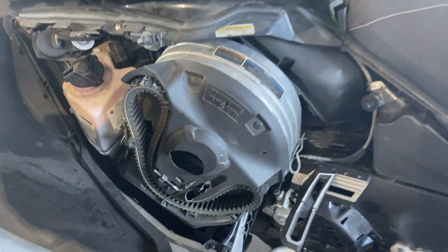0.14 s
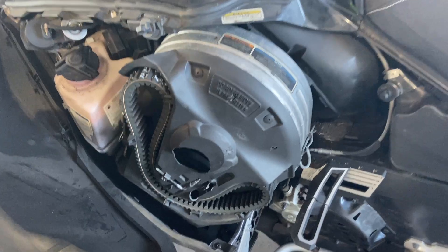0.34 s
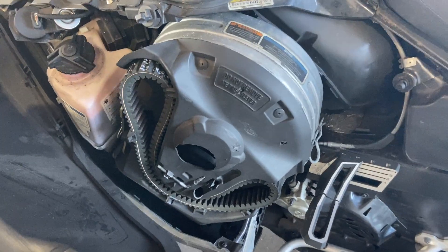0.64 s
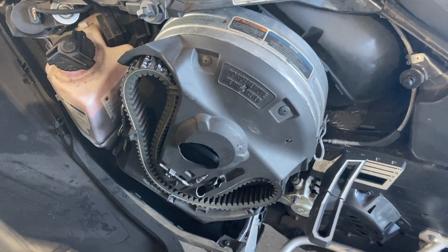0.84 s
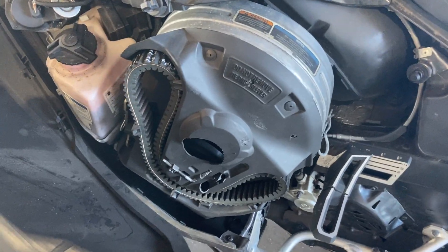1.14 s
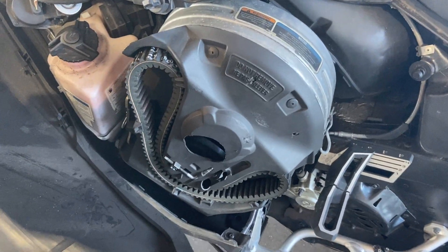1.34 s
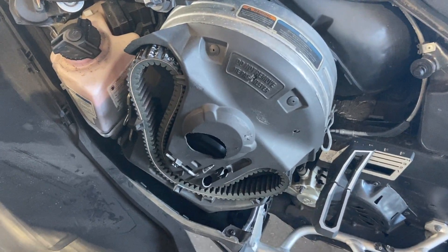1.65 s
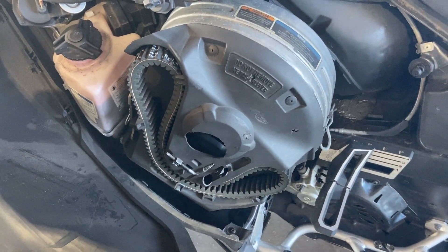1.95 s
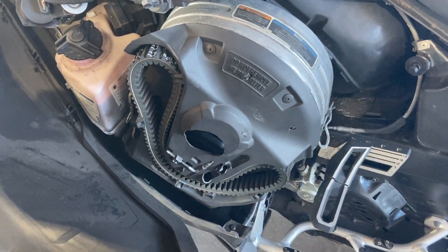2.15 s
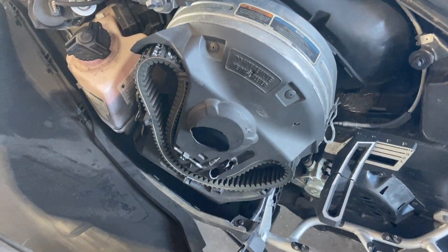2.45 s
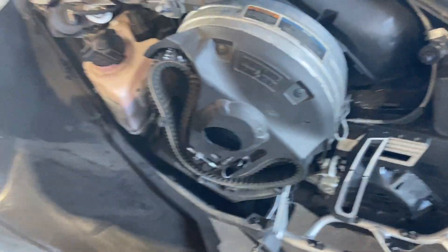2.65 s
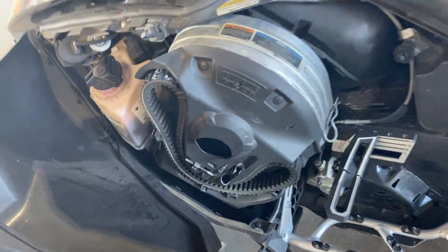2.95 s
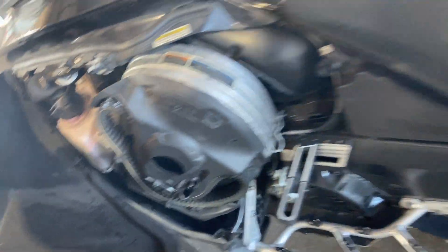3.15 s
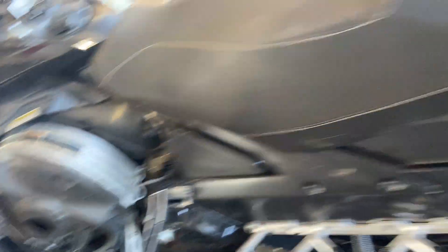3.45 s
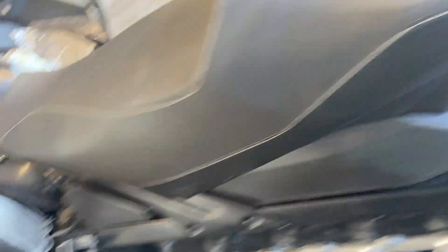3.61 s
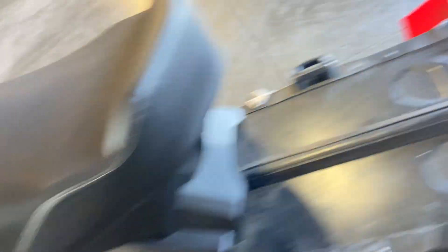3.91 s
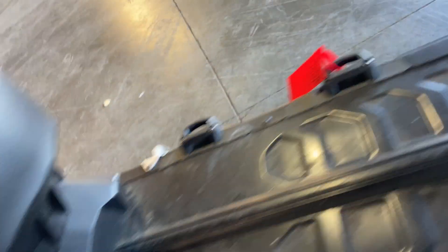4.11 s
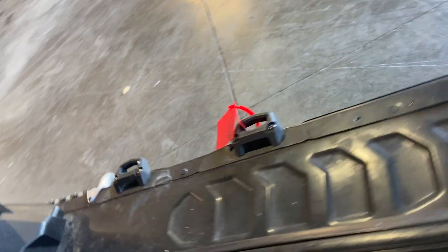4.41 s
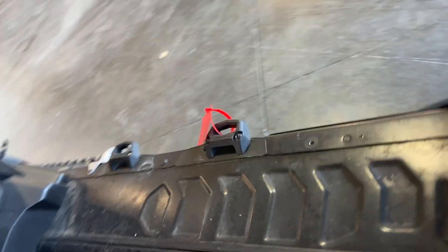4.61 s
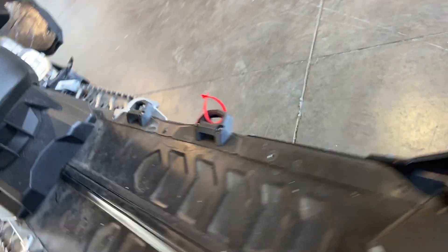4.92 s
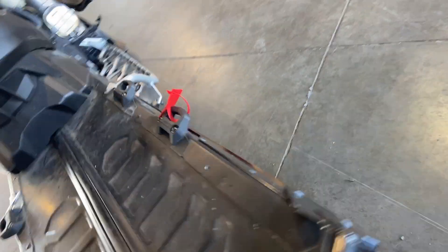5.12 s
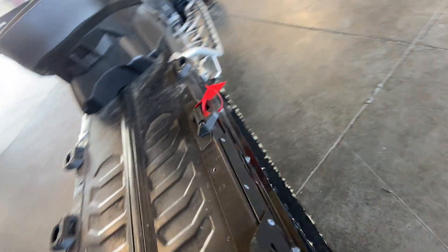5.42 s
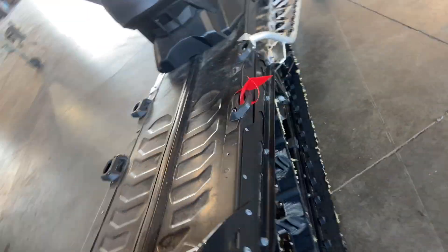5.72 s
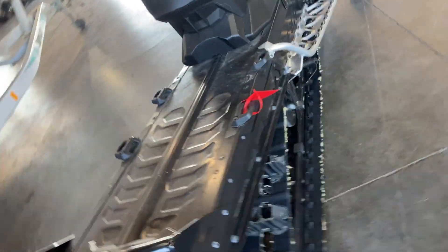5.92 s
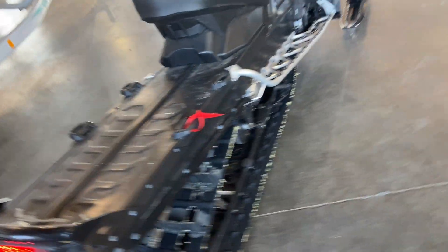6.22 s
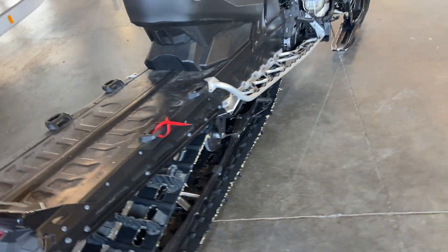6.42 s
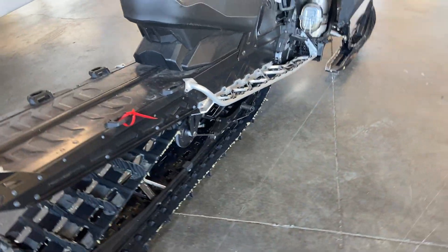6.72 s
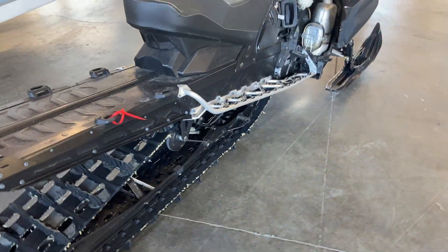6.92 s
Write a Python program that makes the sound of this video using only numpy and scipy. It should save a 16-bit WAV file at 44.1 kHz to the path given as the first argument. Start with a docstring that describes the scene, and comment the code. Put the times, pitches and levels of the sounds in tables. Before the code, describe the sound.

Close, raspy two-cylinder idle with low drone, metallic knocking and airy hiss; a few brighter knocks as the listener swings back, then a softer, boomier idle.

```python
"""A two-cylinder two-stroke snowmobile engine idles in a hard-floored shop, heard by a hand-held stereo microphone.
At first it is held close at the open engine bay: the pipe drones on crank orders, uneven burns rumble through ringing
muffler modes, shaped noise clatters twice a turn, struck metal modes ring with a hard knock and a soft tap each turn,
and filtered noise hisses at the intake. After three seconds it swings back past the seat, where some knocks ring
brighter, returns to just behind the seat, then moves on to the rear of the track and stays there."""
import sys
import numpy as np
from scipy import signal
from scipy.fft import rfft, irfft, next_fast_len
from scipy.io import wavfile
from scipy.ndimage import uniform_filter1d, map_coordinates

SR = 44100
rng = np.random.default_rng(int(sys.argv[2]) if len(sys.argv) > 2 else 0)


def to_wav(sig):
    """Store sig (one row per channel, or 1-D mono) as 16-bit WAV at the path in sys.argv[1].

    Samples outside -1..1 are clipped; the rate is SR.
    """
    pcm = np.clip(np.atleast_2d(sig), -1, 1) * 32767
    pcm = np.round(pcm).astype(np.int16)
    wavfile.write(sys.argv[1], SR, pcm.T)  # frames by channels


N = 311330
T = np.arange(N) / SR  # seconds

# The unsteady idle of the crank. Each row: time in seconds, speed in turns per second.
IDLE_SPEED = [(0.0, 19.63), (0.128, 19.38), (0.257, 19.66), (0.385, 19.22), (0.513, 19.3), (0.642, 19.67),
              (0.77, 19.65), (0.899, 19.29), (1.027, 19.47), (1.155, 19.57), (1.284, 19.45), (1.412, 19.28),
              (1.54, 19.21), (1.669, 19.14), (1.797, 19.49), (1.925, 19.95), (2.054, 20.04), (2.182, 18.86),
              (2.311, 20.1), (2.439, 19.27), (2.567, 19.7), (2.696, 18.99), (2.824, 20.31), (2.952, 20.65),
              (3.081, 19.33), (3.209, 19.64), (3.337, 20.58), (3.466, 20.64), (3.594, 19.35),
              (3.723, 19.61), (3.851, 19.2), (3.979, 20.03), (4.108, 19.17), (4.236, 19.39), (4.364, 19.77),
              (4.493, 19.35), (4.621, 19.91), (4.749, 19.84), (4.878, 19.94), (5.006, 18.27),
              (5.135, 20.29), (5.263, 18.84), (5.391, 20.41), (5.52, 19.72), (5.648, 20.11), (5.776, 19.92),
              (5.905, 19.37), (6.033, 20.26), (6.161, 19.97), (6.29, 21.06), (6.418, 20.42), (6.547, 19.26),
              (6.675, 19.63), (6.803, 20.18), (6.932, 19.23), (7.06, 19.47)]


def crank_turns():
    """The crank angle in turns is the running sum of its speed."""
    start_turn = .063
    speed = np.interp(T, *np.transpose(IDLE_SPEED))
    return start_turn + np.cumsum(speed) / SR


TURN = crank_turns()

# The drone steepens into crests. Each row: time in seconds, 2nd partial in dB, 3rd partial in dB,
# their phase lead in radians.
DRONE_CRESTS = [(0, -34, -41, 0.81), (1.4, -32, -34, 1), (2.1, -34, -29.5, 0.69), (2.6, -33, -34, 0.55),
                (3.3, -30, -34.5, 0.28), (3.8, -34.5, -36, -0.2), (4.2, -31, -33, -.8),
                (4.6, -29.5, -33.5, -0.82), (5.0, -29, -26.5, -1.1), (5.4, -27, -36, -1.2),
                (5.8, -34.5, -54, -1), (6.2, -30.5, -32, .2), (6.6, -29, -32, 0.29),
                (7.06, -31, -28, -0.094)]
# Other crank orders; a half order comes of every second turn burning harder.
# Each row: order in cycles per turn, rms level in dB at the bay, the seat and the rear.
CRANK_ORDERS = [(2, -30, -31.5, -33.5), (3, -43, -61, -35), (4, -28.5, -34, -34.5), (5.5, -53, -55, -45),
                (8, -37.5, -42, -34.5), (10, -40, -43, -46.5), (14, -37.5, -42, -43), (20, -39.5, -51, -50)]


def drone():
    """The regular bass of the exhaust beat: the pipe sings on the sixth order."""
    note = 2 * np.pi * 6 * TURN
    waver_db = placed((0.3, 0.34, 0.61), T) * wobble(25)
    x = amp(walk()["drone"] + waver_db) * np.cos(note)

    *crests, lead = curves(DRONE_CRESTS)
    # the top crest swells with each firing
    depth, chuff_turn = placed((.25, 0.86, 0.36), T), 0.068
    chuff = 1 + depth * np.cos(2 * np.pi * 2 * (TURN - chuff_turn))
    for partial, db, swell in zip((2, 3), crests, (1, chuff)):
        waver_db, waver_rad = .8 * wobble(8), .15 * wobble(8)
        x += swell * amp(db + waver_db) * np.cos(partial * note + lead + waver_rad)

    for order, *db in CRANK_ORDERS:
        waver_db, waver_rad = 1.2 * wobble(7), .25 * wobble(6)
        angle = 2 * np.pi * round(2 * order) / 2 * TURN
        x += amp(placed(db, T) + waver_db) * np.cos(angle - .7 + waver_rad)
    return np.sqrt(2) * x * amp([[.4], [-.4]])  # rms to peak; a touch louder on the left


# What each firing rings in the muffler.
# Each row: centre in Hz, width in Hz, relative level in dB at the bay, the seat and the rear.
MUFFLER_MODES = [(273.1, 16, -1.5, -18, -8), (338, 11, -16, -9, -13), (392, 6.2, -4.5, -15, -8.5),
                 (473, 18, -10, -31, -38)]
# Uneven burns through pipe and hood. Each row: frequency in Hz, relative level in dB at the bay, the seat and the rear.
PIPE_SPECTRA = [(24, -50, -51, -50), (43.6, -13, -17, -16), (60, 3, 2, 0), (84, -17, -17, -11.5),
                (103.5, 6, 2.5, -2.5), (127, -16, -10, -12), (136, 1.5, -0.5, -1), (169, -4.5, -14, -12),
                (212, -5.5, -9.5, -9.5), (300, -5.5, -7.5, -10), (338, -3.5, -5.5, -5.5),
                (409, -9, -10, -11), (485, -4.5, -24, -22), (616, -13, -33, -17), (844, -12.5, -24.5, -19)]


def rumble():
    """Each firing strikes the muffler; no two burns are alike, and each sends a rough puff down the pipe."""
    level = amp(walk()["rumble"] + placed([.8, .45, .5], T) * flares() + 0.57 * wobble(25))
    firings = np.arange(1, int(2 * TURN[-1]))  # two a turn
    alternation = .3 * (-1) ** firings
    scatter = .3 * rng.standard_normal(len(firings))
    strikes = np.zeros(N)
    strikes[np.searchsorted(TURN, firings / 2 + .07)] = 1 + alternation + scatter
    beat = amp(-32.0) * resonating(strikes * level ** 0.087, MUFFLER_MODES, order=1)

    puffs = 3.0 + gate(0.066, 0.019, 0.16, uneven(scatter_db=6.5))
    puffs += gate(0.593, 0.015, 0.11, uneven(scatter_db=5.0))
    rough = coloured(level * gated(puffs), columns(PIPE_SPECTRA), size=8192)
    return beat + spread(rough)


# The rattle of the case: one list each for the bay, the seat and the rear.
# Each row: frequency in Hz, relative level in dB.
CASE_SPECTRA = [
    [(250, -52), (420, -15), (463, 0), (576, -25), (690, -2), (770, -25), (993, -1.5), (1230, -5.5),
     (1540, -10), (1750, -9), (2130, -10), (3100, -16.5), (4510, -20), (5890, -24), (7600, -31.5),
     (9880, -79), (16700, -120)],
    [(250, -50), (420, -6), (498, -4.5), (611, -2.5), (869, -9.5), (1180, -7.5), (1380, -12.5), (1900, -15),
     (2920, -18.5), (4800, -27), (5750, -32.5), (7600, -45), (9880, -126), (16700, -120)],
    [(250, -44), (420, -13), (446, -17), (510, 4), (590, -10), (779, 4), (946, 2), (1040, 0.5), (1690, -4),
     (1910, -3.5), (2180, -8.5), (2620, -13), (3760, -15.5), (7600, -23.5), (9880, -53), (16700, -120)],
]
# Sheet-metal resonances of the hood.
# Each row: centre in Hz, width in Hz, relative level in dB at the bay, the seat and the rear.
HOOD_MODES = [(793, 13, -11, -16, -15), (867, 30, -4.5, -28, -14), (971.5, 76, 3, -17, -25),
              (1088, 69, -8, -15, -10), (1451, 65, -4, -33, -13)]


def clatter(times, knock_db):
    """Pistons and rings rattle the case: a sharp stroke as hard as its knock, then a softer one that bumps the hood."""
    late_turns = placed(TRAVEL_S, T) * np.gradient(TURN) * SR
    last = np.clip(np.searchsorted(times, T) - 1, 0, len(times) - 2)
    since, until = abs(T - times[last]), abs(times[last + 1] - T)
    hard = amp(0.83 * (knock_db - knock_db.mean()))
    snap = (1 - np.exp(-since / .0005)) * np.exp(-since / .0065)
    sharp = placed([.75, .42, .45], T) * hard[last] * snap
    soft = placed([.5, .7, .4], T) * gate(0.554 + late_turns, 0.064, 0.13, uneven(scatter_db=3.0))
    smear = placed([.33, .45, .5], T)  # farther off, the shop's echo fills the gaps
    # the parts fly free just before the sharp stroke
    hush = 1 - np.minimum(.33 * hard[last + 1], .7) * np.exp(-until / .004)
    grit = amp(1.1 * wobble(500))  # loose parts tick in grains
    noise = gated(grit * hush * (smear + sharp + soft))
    case = amp(walk()["clatter"] + 0.5 * flares()) * coloured(noise, CASE_SPECTRA, size=512)

    bumps = .014 * gated(hush * (.5 + sharp + soft))
    turns = np.arange(int(TURN[-1]))
    angles = turns + .64 + .012 * rng.standard_normal(len(turns))
    bumps[:, np.searchsorted(TURN, angles)] += amp(1.1 * rng.standard_normal((2, len(turns))))
    hood = amp(-32.0) * resonating(bumps, HOOD_MODES, order=2)
    return spread(case + hood)


# Knocks with their own time and strength, strong and weak.
# Each row: time in seconds, strength in dB before the metal's own levels.
TIMED_KNOCKS = [(0.261, -11), (0.363, -9.5), (0.571, -8.5), (0.672, -12.5), (0.774, -10.5), (0.876, -13),
                (0.982, -12), (1.082, -12.5), (1.183, -14.5), (1.339, -13), (1.546, -13), (1.652, -13.5),
                (1.805, -11), (1.957, -13.5), (2.107, -12), (2.213, -12.5), (2.264, -13), (2.362, -15),
                (2.571, -14), (2.874, -14.5), (2.923, -11), (1.753, -13), (3.518, -13), (3.884, -5),
                (5.315, -13), (5.366, -11), (5.415, -16), (5.465, -15.5), (5.516, -18), (5.668, -11.5),
                (5.718, -12.5), (5.867, -17), (5.971, -12.5), (5.567, -12.5), (5.617, -14.5), (5.767, -15),
                (5.818, -11), (5.919, -11), (6.02, -12.5), (6.069, -13), (6.117, -16), (6.17, -12),
                (6.219, -13), (6.268, -10.5), (6.315, -16), (6.362, -13), (6.559, -12), (6.714, -13.5),
                (6.863, -15), (6.916, -16), (6.409, -12.5), (6.460, -11), (6.512, -11), (6.613, -12),
                (6.666, -10.5), (6.768, -11), (6.814, -12), (6.966, -14.5), (7.019, -11.5)]


def blows():
    """Time and strength of one knock a turn; every second one tends to be harder."""
    turns = np.arange(int(TURN[-1]) + 1)
    times = np.interp(turns + 0.1, TURN, T)
    times += placed(TRAVEL_S, times)
    levels = -14.5 + 1.2 * (turns % 2) + uneven(scatter_db=.7)
    for s, db in TIMED_KNOCKS:
        nearest = np.argmin(abs(times - s))
        times[nearest], levels[nearest] = s - .001, db
    return times, levels


# What the strokes ring. Each row: frequency in Hz, t60 in seconds, relative level in dB of the hard knock
# at the bay, the seat and the rear, then of the soft tap at the same three places.
METAL_MODES = [(1051, 0.03, 10.5, -22, -9, -2, -49, -17), (1136, 0.037, 6.5, -36, -12, -15, -25, -21),
               (1312, 0.029, 1, -33, -17, 1, -30, -20), (1507, 0.033, -13, -26, -8, -13, -33, -6.5),
               (1751, 0.026, -20, -28, -4, 4, -28, -30), (1890, 0.039, -8, -34, 1.5, -19, -31, -25),
               (2040, 0.046, -10, -33, -11, -16, -26, -27), (2400, 0.029, -13, -18, -8, -8, -21, -8),
               (2650, 0.018, -19, -44, -3.5, -31, -16, -21), (2883, 0.031, -24, -15, -25, -11, -17, -15),
               (3340, 0.027, -21, -25, -11, -23, -37, -26), (3780, 0.027, -9, -13, -13, -23, -16, -20),
               (4450, 0.052, -14.5, -29, -21, -29, -26, -23), (5120, 0.027, -20, -19, -13, -15, -30, -16)]


def knocks(times, levels):
    """Every turn a hard knock, repeated off the floor, and half a turn on a soft tap ring the same metal."""
    hz, t60, *db = np.transpose(METAL_MODES)
    knock_db = levels[:, None] - 5 + placed(db[:3], times).T
    hard = rings(times, knock_db, hz, t60)

    echoes = np.minimum(times + rng.uniform(.004, .009, len(times)), T[-1])
    echo_db = knock_db + placed((-12, -4, -4), times)[:, None]
    floor = rings(echoes, echo_db, hz, t60)

    taps = np.interp(np.arange(int(TURN[-1])) + .6, TURN, T)
    taps += placed(TRAVEL_S, taps) + .0005 * rng.standard_normal(len(taps))
    tap_db = -19 + 1.8 * rng.standard_normal((len(taps), 1))
    soft = rings(taps, tap_db + placed(db[3:], taps).T, hz, t60)
    return hard + floor + soft


# Engine knocks heard brighter while the microphone swings past the seat.
# Each row: time in seconds, strength in dB before the modes' own levels, pitch in Hz.
BRIGHT_KNOCKS = [(3.1496, -13, 2500), (3.249, -20, 2540), (3.275, -20, 2980), (3.2994, -22, 2520),
                 (3.3468, -23, 2540), (3.3752, -16, 2440), (3.4246, -17, 2465), (3.5468, -19, 2500),
                 (3.5962, -23, 3020), (3.674, -18, 3130), (3.7753, -18.5, 3240), (3.8297, -26, 2500),
                 (3.855, -23, 3470), (3.9315, -26, 2550), (3.9833, -21, 2070), (4.0332, -26, 2520),
                 (4.0881, -23, 2120), (4.1111, -27, 2330), (4.1375, -29, 2490)]


def bright_knocks():
    """Each bright knock rings a cluster of modes around its own pitch."""
    s, db, hz = np.transpose(BRIGHT_KNOCKS)
    modes = (.8, .9, .96, 1.03, 1.1, 1.22)  # multiples of the pitch
    flanks_db = -30 * abs(np.log(modes))
    return rings(s - .001, db[:, None] - 5 + flanks_db, np.outer(hz, modes), t60=0.042)


# Intake air. Each row: frequency in Hz, relative level in dB at the bay, the seat and the rear.
AIR_SPECTRA = [(2350, -25, -7, -1), (3850, 3.5, 13.5, 1.5), (6000, -4.5, -0.5, -9), (6640, 2.5, 5.5, -6.5),
               (9500, 3, 8.5, -3), (9700, 8.5, 10.5, 8), (9950, 1.5, 6.5, -3.5), (13000, 2, 3.5, -7),
               (14700, -1, 4, -8), (15700, -6, -11, -16)]
# The treble is in step or out of step between left and right, by frequency.
# Each row: frequency in Hz, half cycles by which the right leads.
TREBLE_PHASE = [(7400, 0), (8600, 1), (9400, 1), (10700, 2), (11600, 2), (13000, 3), (13700, 3), (14900, 4)]


def hiss():
    """Intake air, pulsing a little with each stroke and fluttering."""
    pulse = gate(.42, .05, .2, uneven(scatter_db=2.5)) + gate(.92, .05, .2, uneven(scatter_db=2.5))
    flow = (1.5 + pulse) * amp(2.04 * wobble(40))
    level = amp(walk()["hiss"] + placed([.62, .5, .55], T) * flares() + 0.24 * wobble(18))
    air = level * coloured(gated(flow)[0], columns(AIR_SPECTRA), size=512)

    def sides(hz):
        lead_rad = np.pi * np.interp(hz, *np.transpose(TREBLE_PHASE))
        return np.exp(np.outer([-.5j, .5j], lead_rad))
    return filtered(air, sides)


# Hard burns, heard as a flare of rumble, clatter and hiss.
# Each row: time in seconds, strength over the usual burn in dB before each layer takes its share.
HARD_BURNS = [(.27, 1), (.49, 3), (.61, 6), (.70, 2.5), (1.005, 2.5), (1.14, 4.5), (1.57, 5.5), (1.67, 7.5),
              (1.77, 0.5), (2.242, 8), (2.63, 3), (2.74, 7.5), (4.48, 6), (4.66, 6), (5.07, 6), (5.29, 7),
              (6.17, 3.5), (6.78, 0), (6.92, 1)]


def flares():
    """The swell in dB of the hard burns, each after a short lull."""
    flare_s, lull_s, lull_share = 0.02, 0.04, 0.38  # half length; lead of the lull; its depth

    def bump(s):
        return np.exp(-((T - s) / flare_s) ** 2 / 2)
    return sum(db * (bump(s) - lull_share * bump(s - lull_s)) for s, db in HARD_BURNS)


# Levels along the walk. Each row: time in seconds, clatter in dB, left minus right in dB of the metal sounds,
# drone in dB, rumble in dB, hiss in dB.
WALK_LEVELS = [(0, -25.5, -0.5, -19.5, -21, -37), (.3, -24, -0.5, -16.5, -21.5, -35.5),
               (1.7, -24, -0.5, -17, -21, -35), (2.7, -24, -1, -17, -21.5, -35),
               (3.21, -22.5, -1, -19, -21, -35), (3.58, -28, 3.5, -19.5, -22, -40),
               (4.1, -32.5, 3, -21, -22.5, -48), (4.95, -33, 2.5, -23, -22.5, -46),
               (5.3, -34, 3.5, -21, -24, -42.5), (5.6, -33, 1.5, -21.5, -26, -40),
               (6.3, -31.5, 0, -19, -26, -39.5), (7.06, -29.5, -2, -16.5, -24.5, -40)]


def walk():
    """The level curves by name, as the microphone is carried along."""
    return dict(zip(("clatter", "lean", "drone", "rumble", "hiss"), curves(WALK_LEVELS)))


# Where the microphone is held. Each row: time in seconds, place (0 engine bay, 1 behind the seat,
# 2 rear of the track; values beyond are held at the ends).
MIC_PLACE = [(0, 0), (3.2, -0.26), (3.52, 1.8), (3.8, 1.17), (4.1, 0.7), (4.9, 1.33), (5.25, 2),
             (5.52, 1.9), (7.06, 6)]
TRAVEL_S = (.0001, 0.0033, 0.0039)  # extra sound travel in seconds at bay, seat, rear


def placed(values, t):
    """Blends the bay, seat and rear values by where the microphone is at times t."""
    place = np.clip(np.interp(t, *np.transpose(MIC_PLACE)), 0, 2)
    return sum(np.multiply.outer(v, np.clip(1 - abs(place - k), 0, 1)) for k, v in enumerate(values))


# The stereo image. Each row: frequency in Hz, left-right likeness (1 alike) at the bay, the seat and the rear,
# radians by which the left leads, left minus right in dB.
STEREO_IMAGE = [(60, 0.92, 0.97, 0.82, 0, 0), (152, 0.97, 0.97, 0.9, 0.066, -2),
                (384, 0.9, 0.73, 0.4, 0.16, -.5), (695, 0.95, 0.46, 1, 0.87, 1.5),
                (1310, 0.6, 0, 0.41, 0.11, -2), (2060, 0.37, 0, 1, 0.52, 2.5),
                (2550, 0.65, 1, 0.96, 0.74, 7), (3900, 0.63, 0.73, 0.53, 0.0021, 4),
                (7000, 0.41, 0, 0.23, 0, 3.5)]


def spread(pair):
    """Two unrelated signals become left and right, as alike as the shop leaves them at each place."""
    def column(k, hz):
        return along([(r[0], r[k]) for r in STEREO_IMAGE], hz)

    def mixing(k):
        def response(hz):
            turn = np.arccos(np.clip(column(k, hz), -1, 1)) / 2
            return np.array([np.cos(turn), np.sin(turn)])
        return response

    def lean(hz):
        phase = np.exp(np.outer([.5j, -.5j], column(4, hz)))
        return amp(np.outer([.5, -.5], column(5, hz))) * phase
    heard = [filtered(pair, mixing(k)) for k in (1, 2, 3)]
    mid, side = sum(h * placed(w, T) for h, w in zip(heard, np.eye(3)))
    return filtered(np.array([mid + side, mid - side]), lean)


def rings(times, levels_db, hz, t60):
    """Each blow swells, buzzes and dies in its row of modes, a little differently; the left leads in phase."""
    t = np.arange(SR // 16)[:, None] / SR
    grain = round(.003 * SR)  # 3 ms grain of the buzz
    out = np.zeros((2, N + len(t)))
    for s, mode_db, mode_hz in zip(times, levels_db, np.broadcast_to(hz, levels_db.shape)):
        chance = rng.standard_normal((3, len(mode_hz)))
        swell = (1 - np.exp(-t / placed((.0016, .002, .003), s))) ** 2  # slower farther off
        size = amp(mode_db + .9 * chance[0] - 60 * t / t60) * swell
        buzz = uniform_filter1d(rng.standard_normal(size.shape), grain, axis=0) * np.sqrt(grain)
        size *= 1 + placed((.22, .4, .4), s) * buzz
        angle = 2 * np.pi * mode_hz * (1 + .012 * chance[1]) * t
        for side, skew in enumerate((.5 + 0.13 * chance[2], -.4)):
            out[side, round(s * SR):][:len(t)] += (size * np.sin(angle + skew)).sum(1)
    return out[:, :N]


def resonating(x, modes, order):
    """x rings every resonance of the rows, each at rms 1 before its level; order 2 swells softly."""
    out = 0
    for k, (centre_hz, width_hz, *db) in enumerate(modes):
        def response(f):
            damping = 1j * f * width_hz
            return (-1) ** k * (damping / (centre_hz ** 2 - f * f + damping)) ** order
        ring = filtered(x, response)
        out = out + amp(placed(db, T)) * ring / np.sqrt(np.mean(ring ** 2))
    return out


def gate(at, rise, fall, size_db):
    """An envelope that opens at a crank angle and dies away, all in turns; size_db holds one strength per turn."""
    count, since = np.divmod(TURN - at, 1)
    return amp(size_db)[count.astype(int)] * (1 - np.exp(-since / rise)) * np.exp(-since / fall)


def gated(envelope):
    """A pair of noises under the envelope, rms 1."""
    return rng.standard_normal((2, N)) * envelope / np.sqrt(np.mean(envelope ** 2))


def uneven(scatter_db):
    """A random strength in dB for every turn."""
    return scatter_db * rng.standard_normal(int(TURN[-1]) + 1)


def wobble(rate):
    """A smooth random curve, rate knots a second."""
    return map_coordinates(rng.standard_normal(int(N * rate / SR) + 4), [T * rate])


def coloured(x, spectra, size):
    """White noise takes the spectrum of the place it is heard from, keeping its power."""
    hz, t, z = signal.stft(x, SR, nperseg=size)
    gain = amp(placed([along(s, hz) for s in spectra], t))
    return signal.istft(z * gain / np.sqrt(np.mean(gain ** 2, 0)), SR, nperseg=size)[1][..., :N]


def columns(rows):
    """Rows of Hz, bay, seat and rear dB as three spectra, closed at both ends."""
    return [[(1, -120)] + [(r[0], r[k]) for r in rows] + [(SR / 2, -120)] for k in (1, 2, 3)]


def filtered(x, response):
    """x passed through a complex response of frequency."""
    m = next_fast_len(N + 8192)
    return irfft(rfft(x, m) * response(np.fft.rfftfreq(m, 1 / SR)), m)[..., :N]


def along(points, hz):
    """Points of Hz and value, read off on a log frequency axis."""
    f, v = np.transpose(points)
    return np.interp(np.log(hz + 1), np.log(f + 1), v)


def curves(rows):
    """One value per sample for each column after the time."""
    s, *cols = np.transpose(rows)
    return [np.interp(T, s, c) for c in cols]


def amp(db):
    """Decibels to amplitude."""
    return 10 ** (np.asarray(db) / 20)


def scene():
    """All the sounds of the engine together; the metal sounds lean left or right along the walk."""
    pan = amp(np.outer([.5, -.5], walk()["lean"]))
    times, levels = blows()
    metal = clatter(times, levels) + knocks(times, levels) + bright_knocks()
    return drone() + rumble() + pan * metal + hiss()


def record(dry):
    """The microphone rounds the highest peaks and drops the deepest bass; nothing is kept above the band limit."""
    top_hz, bass_hz = 15900, 32
    rounded = dry / (1 + abs(dry / .95) ** 6) ** (1 / 6)
    return filtered(rounded, lambda hz: (hz < top_hz) / np.sqrt(1 + (bass_hz / (hz + 1)) ** 16))


dry = scene()
out = record(dry)
to_wav(out)
```